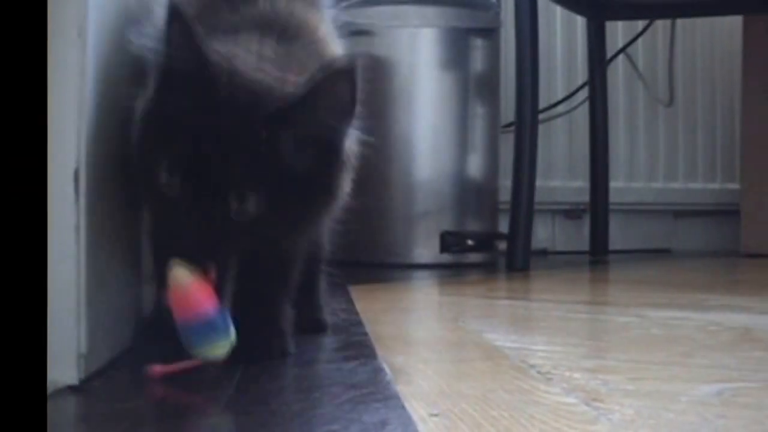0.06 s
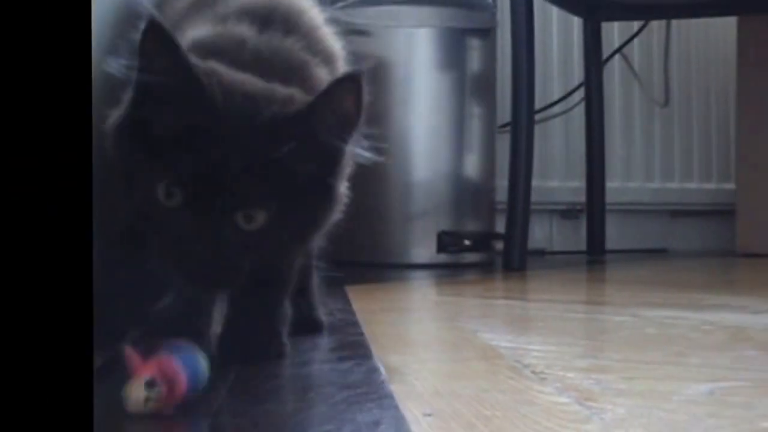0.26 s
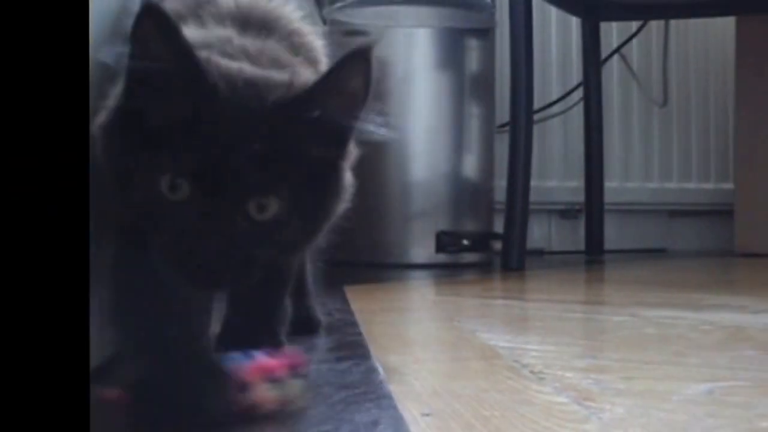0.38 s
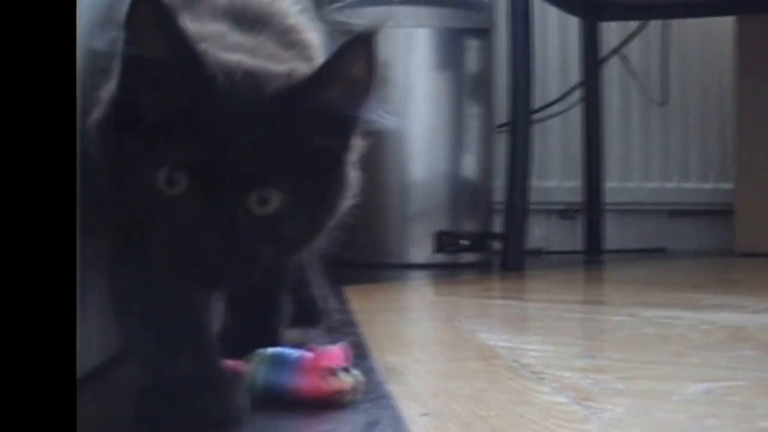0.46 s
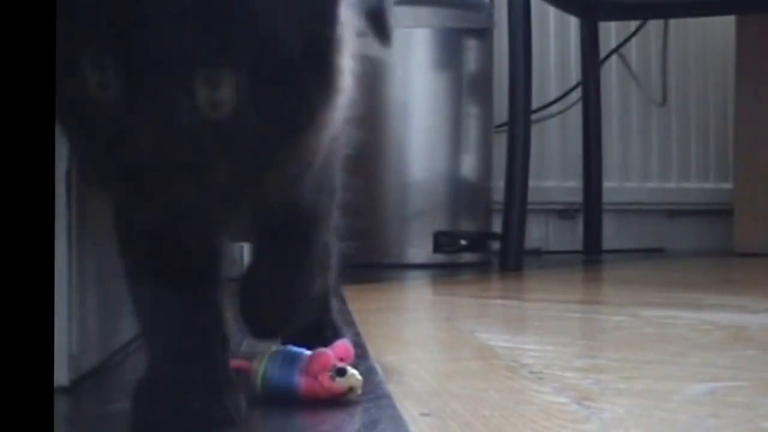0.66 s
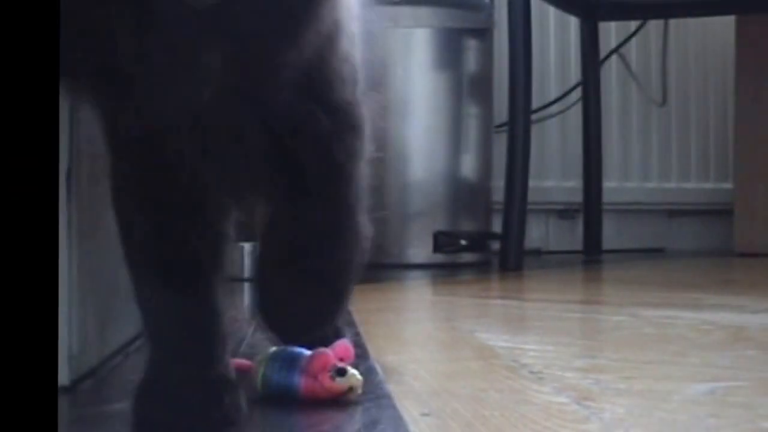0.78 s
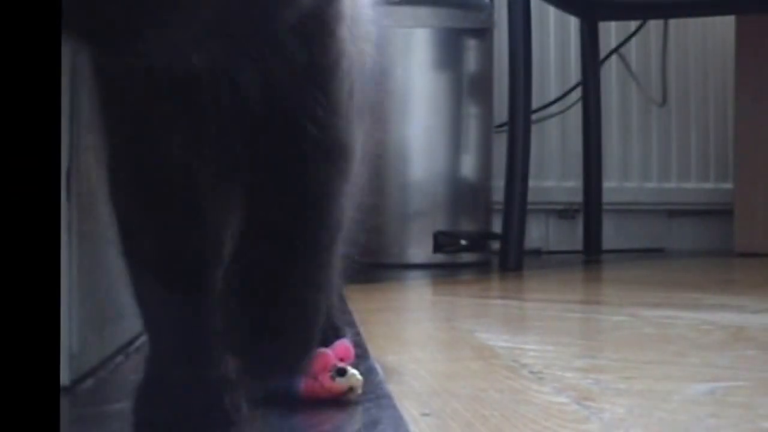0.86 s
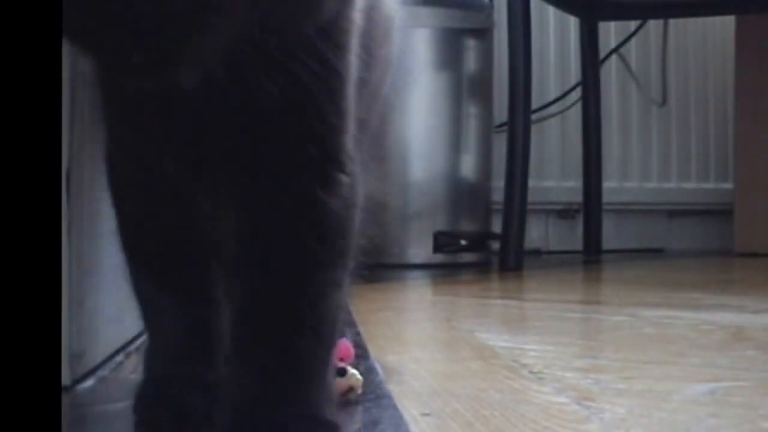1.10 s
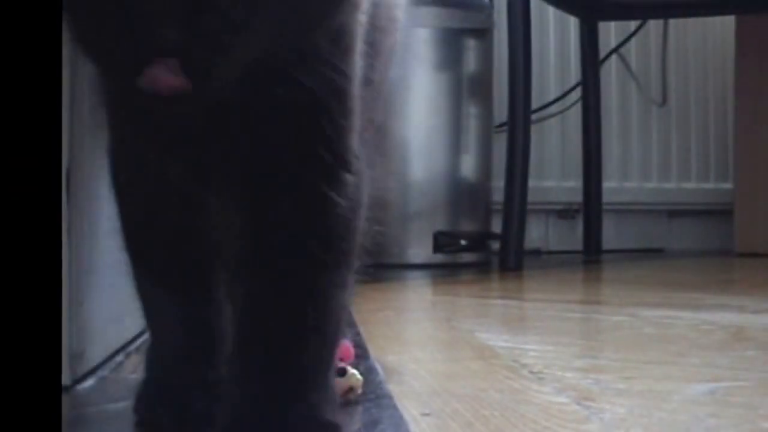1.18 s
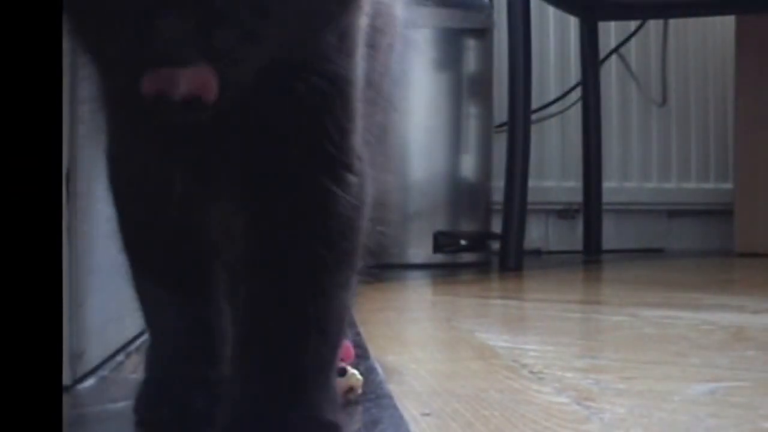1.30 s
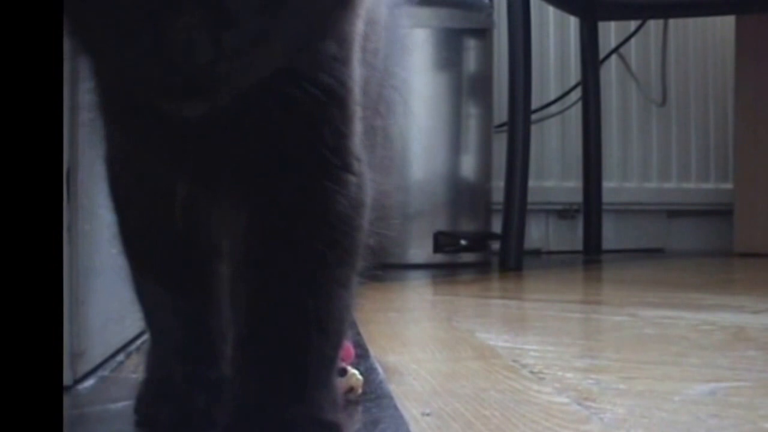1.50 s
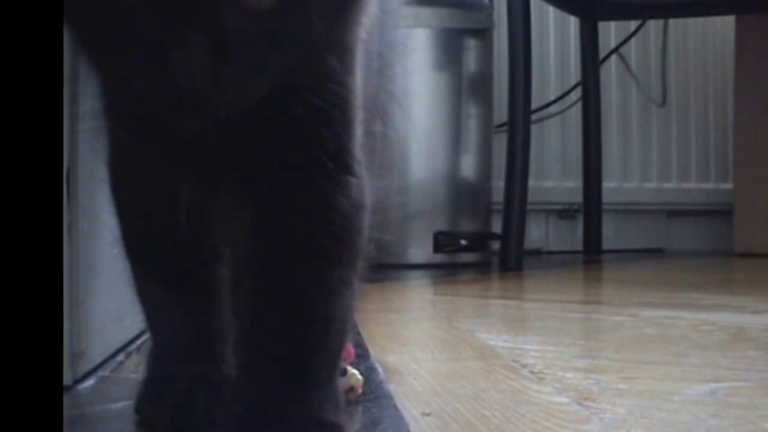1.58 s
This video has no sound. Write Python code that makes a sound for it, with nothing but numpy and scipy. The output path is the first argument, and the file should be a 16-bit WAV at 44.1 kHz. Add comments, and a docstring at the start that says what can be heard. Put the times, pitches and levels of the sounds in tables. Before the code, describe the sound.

Close by, tiny beads tick inside a toy mouse before two strong woody knocks and a weaker one, with rattling and scuffing that quickly fade, leaving a quiet, slightly echoing room with a fridge-like hum.

```python
"""A fridge-like hum and room noise are heard first; then beads tick inside a small toy, which a kitten
bats over a wooden floor close by, so that it knocks, bounces and scuffs on the boards.
Knocks and ticks are sums of decaying modes driven by short contact forces; scuffing is a dense train
of tiny random impulses, filtered; the air is shaped noise, the hum a set of wavering sines.
Knocks, scuffs and ticks also excite a reverberant room of sparse random taps."""
import sys
import numpy as np
from scipy import signal
from scipy.fft import rfft, irfft
from scipy.io import wavfile
from scipy.ndimage import uniform_filter1d

SR = 44100
rng = np.random.default_rng(int(sys.argv[2]) if len(sys.argv) > 2 else 0)


def int16_out(signal):
    """Quantize to a 16-bit WAV file."""
    q = np.round(np.clip(np.atleast_2d(signal).T, -1, 1) * 32767)
    wavfile.write(sys.argv[1], SR, q.astype(np.int16))


def volts(x):
    """Linear amplitude factor 10**(x/20) for a level x in dB, scalar or array-like."""
    e = np.asarray(x, float) / 20
    return 10 ** e


N = 72765  # length in samples

# Spectrum of the room noise: frequency_hz, relative_density_db
AIR_SPECTRUM = [(20, -11), (35, -8), (70, -8), (120, -3), (180, 2.5), (240, 5), (350, -2), (857, -8.5),
                (1200, -12.5), (1850, -20), (4110, -24.5), (7310, -30), (9900, -34), (12000, -39.5),
                (16000, -45)]
# Left-right likeness of the room noise: frequency_hz, correlation (no unit)
AIR_LIKENESS = [(60, 0.74), (180, 0.83), (550, 0.68), (1650, 0.2), (4970, 0.56), (15000, 0.46)]
# Tones of the appliance, before panning: frequency_hz, rms_level_db, rms_wavering_db
HUM_TONES = [(49.5, -51.5, -0.4), (98.8, -51, 3.0), (145, -53, -0.5), (178.1, -43.5, 1.0), (233.7, -50, 2),
             (270, -56, 2.5), (301, -55.5, 5)]
# Level of the toy's scuffing, before panning: time_s, level_db
SCUFF_LEVEL = [(0, -55), (.12, -56), (.2, -49), (.24, -47), (.3, -58), (.34, -54), (.4, -46), (.45, -49),
               (.49, -52), (.525, -44.5), (.553, -41), (.575, -51.5), (.6, -58), (.7, -78)]
# Spectrum of the scuffing: frequency_hz, relative_density_db
SCUFF_SPECTRUM = [(300, -42), (550, -9), (820, 3.5), (1100, -9), (1400, -7.5), (2200, -13.5), (3200, -23),
                  (5000, -30.5), (9000, -27), (14000, -55)]
# Beads striking the shell, before rebounds and panning: strike_s, peak_db, brightness_hz
BEAD_STRIKES = [(.0581, -24, 5000), (.0781, -41, 5400), (.1051, -25, 7200), (.1126, -29, 6800),
                (.1261, -27, 6560), (.1539, -34, 5550), (.1576, -38, 4600), (.1675, -35.5, 5800),
                (.1706, -29, 7440), (.2153, -26, 5750), (.2231, -19.5, 6100), (.2311, -42, 8000),
                (.2338, -30, 6900), (.2533, -39, 5160), (.2672, -24.5, 5300), (.27, -24.5, 5700),
                (.2753, -24.5, 6300), (.3003, -21, 7500), (.3047, -13, 8000), (.3069, -11, 7400),
                (.3126, -17.5, 7460), (.3339, -29, 7700), (.3731, -20, 5250), (.3754, -27, 5550),
                (.3881, -39, 4400), (.418, -28, 8000), (.429, -30, 5900), (.4326, -28.5, 5470),
                (.446, -31, 5030), (.4537, -35, 6100), (.4975, -45, 3500), (.517, -30, 6000),
                (.5301, -27.5, 6300), (.538, -39, 5200), (.5516, -38, 4470), (.5836, -35, 5200),
                (.5889, -46, 5720), (.5963, -28, 5740), (.6076, -36, 6140), (.6139, -35, 4500),
                (.6273, -53, 5500), (.6395, -27, 7000), (.6554, -41, 6200), (.6636, -37, 5800),
                (1.2692, -36, 10000)]
# Modes of the toy's shell, before random detuning and lift: frequency_hz, level_db, t60_s
SHELL_MODES = [(2845, -0.5, 0.0055), (3700, -6.5, 0.003), (5000, -3.5, .004), (6300, -4, 0.0022),
               (8000, -3, 0.0027), (9640, -7, 0.0027), (11400, -11, 0.0018), (13500, -22, .0015)]
# Landings of the toy, before panning: start_s, peak_db, contact_ms, brightness_db_per_octave
LANDINGS = [(0.2128, -6.5, 1.14, -4), (.232, -25.5, 1.7, 11.5), (0.2554, -31, 1.3, 2),
            (.2655, -30, 1.43, 1), (0.3022, -1, 0.57, -0.5), (.339, -25.5, 1.04, -6),
            (0.3623, -10.5, 0.57, -3.5), (0.3846, -18, 0.25, 2), (.422, -28, 0.48, 1.5),
            (.468, -27, 0.5, 4.5), (.528, -31, .5, 0), (.550, -30, 0.82, 4.5)]
# Modes of the floor boards, before the brightness tilt: frequency_hz, level_db, t60_s
BOARD_MODES = [(137.2, -23.5, 0.34), (205.4, -8, 0.044), (269, -7.5, 0.0306), (343.7, -5.5, 0.048),
               (390.6, 5, 0.024), (513, -12, 0.025), (596, -23, .04), (670, -17, 0.033), (792, -26, 0.047),
               (955, -14, 0.023), (1247, -24.5, 0.013), (1550, -31.5, 0.017), (2025, -25, 0.015),
               (2590, -43, 0.025)]
# Reverberation time of the room: frequency_hz, t60_s
ROOM_DECAY = [(130, 0.52), (250, .5), (400, 0.24), (1000, 0.37), (4000, 0.26), (10000, 0.18)]

AIR_DB, PATCH_DB, SWELL_DB = -42, 1.37, 0.54  # mean level; rms depth of patches and of swell
SCUFF_PER_S, SCUFF_GRAIN_DB = 1200, 4  # catches per second; scale of their random level
RATTLE_START_S, RATTLE_END_S = .03, .67  # span of the faint random bead ticks
SMALL_PER_S, SMALL_FLOOR_DB = 70, -48.5  # their rate and lowest nominal level
BRIGHT_DB_PER_OCT, SHELL_SPREAD_DB = 12, 2  # fall away from the brightness; random mode lift
REBOUND_SPREAD_S, REBOUND_DB, LEAD_S = .0005, -6.5, .0002
BOARD_RISE_CYCLES, SHELL_RISE_CYCLES = 0.53, 0.11  # ringing builds up over this many cycles
BOARD_CUT_HZ = 122.6  # the boards radiate little below this
KNOCK_WET_DB, TICK_WET_DB, ROOM_LIKENESS = -13.5, -14, 0.58
KNOCK_PAN_DB, TICK_PAN_DB, AIR_PAN_DB = -2, 4, -1  # left level minus right level
MIRROR_HZ, MIRROR_DB, MIRROR_BAND_HZ = 16000, -25, (450, 2200)
EDGE_HZ = 15880  # top edge of the band


def evened(x):
    """Normalization: scales a signal to an rms value of 1."""
    return x / np.sqrt(np.mean(x ** 2) + 1e-20)


def read(points, hz):
    """Interpolation: reads a table linearly along a log-frequency axis."""
    f, value = np.transpose(points)
    return np.interp(np.log(hz + 1), np.log(f + 1), value)


def add(mix, start_s, sound):
    """Superposition: adds a sound to the mix from a given time."""
    part = mix[round(start_s * SR):][:len(sound)]
    part += sound[:len(part)]


def slow(top_hz, count):
    """Random drift: sums slow sines of random phase, weaker as they quicken, to rms 1."""
    t = np.arange(N) / SR
    f = np.geomspace(.4, top_hz, 12)[:, None]
    drifts = []
    for turns in rng.random((count, 12)):
        waves = np.sin(2 * np.pi * (f * t + turns[:, None])) / np.sqrt(f)
        drifts.append(evened(waves.sum(0)))
    return np.array(drifts)


def struck(modes, lift_db, contact_s, rise_cycles, size):
    """Modal excitation: a half-sine force drives decaying modes; pressure is the slope, peak 1."""
    t = np.arange(size) / SR
    ring = np.zeros(size)
    for (hz, db, t60), lift in zip(modes, lift_db):
        decay = volts(db + lift - 60 * t / t60)
        build_up = 1 - np.exp(-t * hz / rise_cycles)
        ring += decay * build_up * np.sin(2 * np.pi * hz * t)
    force = np.sin(np.pi * np.clip(t[:256] / contact_s, 0, 1))
    pressure = np.gradient(np.convolve(ring, force)[:size])
    return pressure / abs(pressure).max()


def air():
    """Shaped noise: partly correlated stereo spectra with drifting patches and a slow swell."""
    frames, hz = N // 512 + 6, np.fft.rfftfreq(2048, 1 / SR)
    a, b, c, d, patches = rng.standard_normal((frames, 1025, 5)).T
    patches = uniform_filter1d(patches, 20, 0)  # smooth over frequency
    patches = evened(uniform_filter1d(patches, 6, 1))  # then over time
    likeness = np.clip(read(AIR_LIKENESS, hz), -1, 1)[:, None]
    left = a + 1j * b
    right = likeness * left + np.sqrt(1 - likeness ** 2) * (c + 1j * d)
    spectra = np.array([left, right]) * volts(read(AIR_SPECTRUM, hz)[:, None] + PATCH_DB * patches)
    noise = signal.istft(spectra, nperseg=2048, noverlap=1536)[1]
    noise = evened(noise[:, 1024:N + 1024])
    return volts(AIR_DB + SWELL_DB * slow(4.3, count=1)) * noise


def hum():
    """Amplitude modulation: low steady tones of an appliance, each wavering in level."""
    t, out = np.arange(N) / SR, np.zeros(N)
    drifts = slow(6.78, count=len(HUM_TONES))
    turns = rng.random(len(HUM_TONES))
    for (hz, db, waver_db), drift, turn in zip(HUM_TONES, drifts, turns):
        level = np.sqrt(2) * volts(db + waver_db * drift)  # sine peak from rms
        out += level * np.sin(2 * np.pi * (hz * t + turn))
    return out


def scuff():
    """Friction noise: dense tiny catches of cloth on wood, coloured by the boards."""
    present = rng.random(N) < SCUFF_PER_S / SR
    size = volts(SCUFF_GRAIN_DB * np.minimum(rng.exponential(1, N), 5))
    catches = present * size * rng.choice([-1., 1.], N)
    colour = volts(read(SCUFF_SPECTRUM, np.fft.rfftfreq(N, 1 / SR)))
    coloured = evened(irfft(rfft(catches) * colour, N))
    return coloured * volts(np.interp(np.arange(N) / SR, *np.transpose(SCUFF_LEVEL)))


def rattle():
    """Impact of beads on a shell: bursts of strikes excite the modes near each one's brightness."""
    span_s = RATTLE_END_S - RATTLE_START_S
    strikes = list(BEAD_STRIKES)
    for a, b, c in rng.random((round(SMALL_PER_S * span_s), 3)):  # faint random ticks
        strikes.append((RATTLE_START_S + a * span_s, SMALL_FLOOR_DB - 3.96 * np.log(b), 4000 * 2 ** (0.92 * c)))
    out, mode_hz = np.zeros(N), np.array([mode[0] for mode in SHELL_MODES])
    chance = rng.standard_normal((len(strikes), 2 * len(SHELL_MODES) + 4))
    for (strike_s, db, bright_hz), c in zip(strikes, chance):
        lift_db = SHELL_SPREAD_DB * c[4::2] - BRIGHT_DB_PER_OCT * abs(np.log2(mode_hz / bright_hz))
        modes = [(hz * (1 + 0.065 * d), m_db, t60) for (hz, m_db, t60), d in zip(SHELL_MODES, c[5::2])]
        tick = volts(db) * struck(modes, lift_db, .00009, SHELL_RISE_CYCLES, size=400)
        start_s = strike_s - LEAD_S
        add(out, start_s, tick)
        # two weaker strikes, shortly before or after, of random polarity
        for late, size in c[:4].reshape(2, 2):
            rebound = volts(REBOUND_DB - 8.4 * abs(size)) * np.sign(size) * tick
            add(out, start_s + REBOUND_SPREAD_S * late, rebound)
    return out


def knocks():
    """Contact time: each landing rings the same boards, duller the longer the contact lasts."""
    out = np.zeros(N)
    octaves = np.log2([mode[0] / 400 for mode in BOARD_MODES])
    cut = signal.butter(4, BOARD_CUT_HZ, "high", fs=SR, output="sos")
    for start_s, db, contact_ms, tilt_db in LANDINGS:
        contact_s = max(contact_ms, .2) / 1000
        ring = struck(BOARD_MODES, tilt_db * octaves, contact_s, BOARD_RISE_CYCLES, size=16000)
        ring = signal.sosfilt(cut, ring)
        add(out, start_s, volts(db) * ring / abs(ring).max())
    return out


def room(x):
    """Reverberation: convolves with sparse random taps, each band decaying at its own rate."""
    taps = np.zeros((2, SR))
    # one tap in every 20 samples, after a gap of 300
    at = np.arange(300, SR - 20, 20) + rng.integers(0, 20, (2, (SR - 301) // 20))
    np.put_along_axis(taps, at, rng.choice([-1., 1.], at.shape), 1)
    taps[1] = ROOM_LIKENESS * taps[0] + np.sqrt(1 - ROOM_LIKENESS ** 2) * taps[1]
    hz, t, spectra = signal.stft(taps, SR, nperseg=512)
    decay = volts(-60 * t / read(ROOM_DECAY, hz)[:, None])
    tail = signal.istft(spectra * decay, SR, nperseg=512)[1]
    tail = tail / np.linalg.norm(tail[0])
    return signal.fftconvolve(x[None], tail, axes=1)[:, :N]


def scene():
    """Superposition: direct toy sounds, their reverberation and the background, panned by level."""
    side = np.array([[.5], [-.5]])  # left, right
    background = air() + hum()
    wood = scuff() + knocks()
    beads = rattle()
    wet = room(volts(KNOCK_WET_DB) * wood + volts(TICK_WET_DB) * beads)
    direct = wood * volts(KNOCK_PAN_DB * side) + beads * volts(TICK_PAN_DB * side)
    return direct + wet + background * volts(AIR_PAN_DB * side)


def top_cut(x):
    """Nothing passes above the cut-off."""
    return signal.sosfilt(signal.butter(12, 17060, fs=SR, output="sos"), x)


def record(dry):
    """Modulation and band limiting: a faint mirror image of the bass lies under the top edge."""
    band = signal.butter(2, MIRROR_BAND_HZ, "band", fs=SR, output="sos")
    carrier = np.cos(2 * np.pi * MIRROR_HZ * np.arange(N) / SR)
    mirror = volts(MIRROR_DB) * signal.sosfilt(band, dry) * carrier
    low_pass = signal.firwin(1023, EDGE_HZ, window=("kaiser", 8), fs=SR)
    mix = signal.oaconvolve(np.clip(dry, -1, 1) + mirror, low_pass[None], "same")
    return top_cut(mix)


dry = scene()
out = record(dry)
int16_out(out)
```